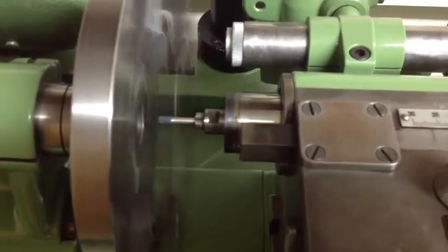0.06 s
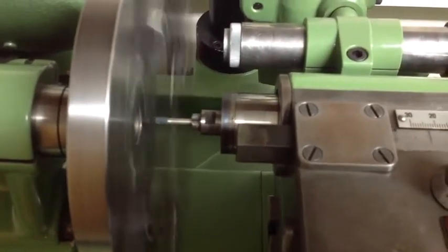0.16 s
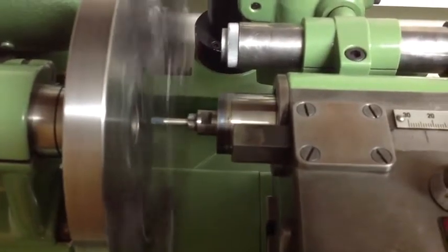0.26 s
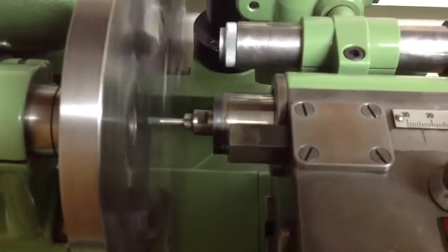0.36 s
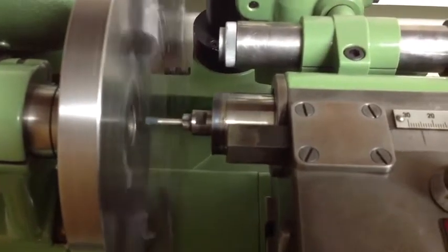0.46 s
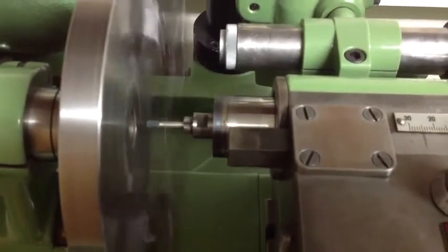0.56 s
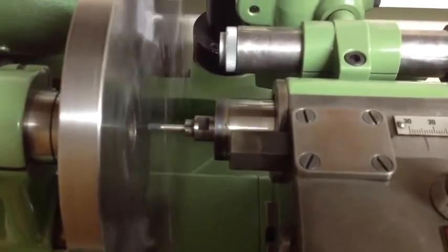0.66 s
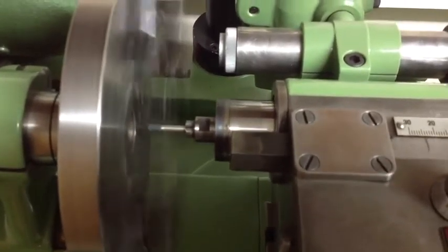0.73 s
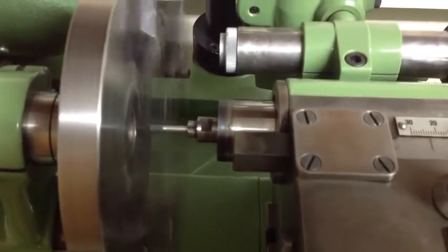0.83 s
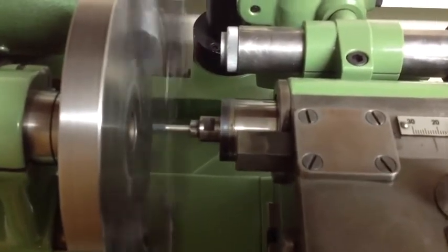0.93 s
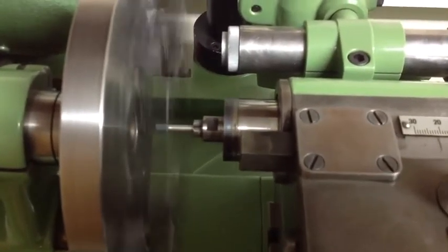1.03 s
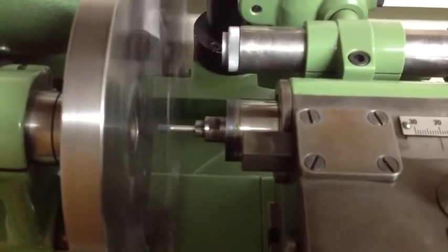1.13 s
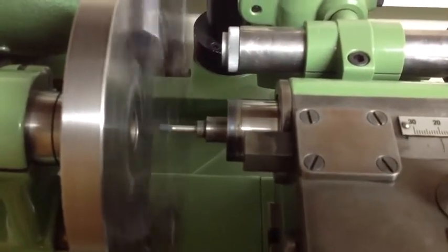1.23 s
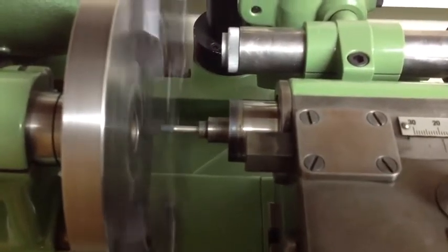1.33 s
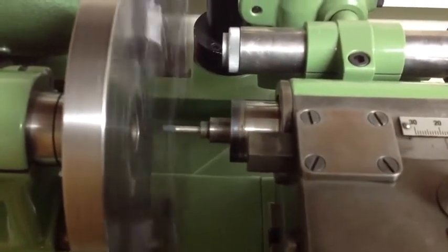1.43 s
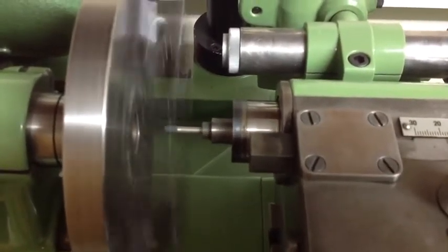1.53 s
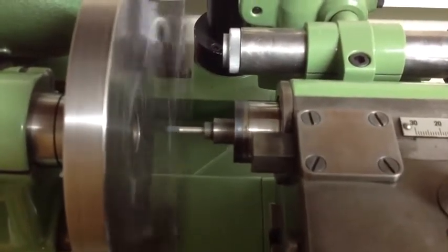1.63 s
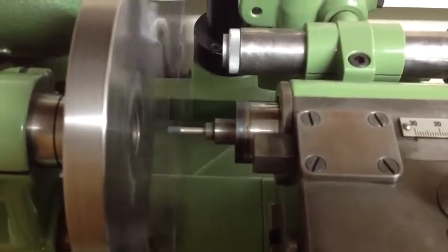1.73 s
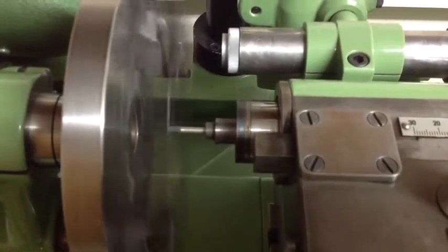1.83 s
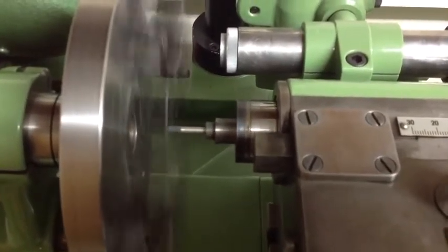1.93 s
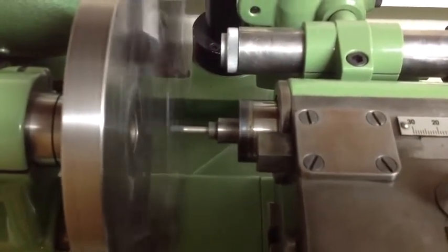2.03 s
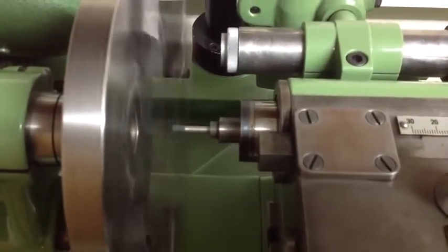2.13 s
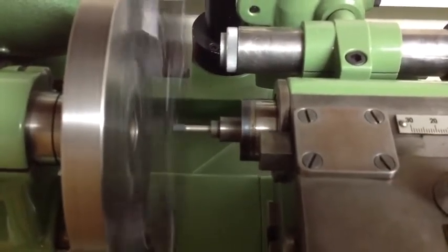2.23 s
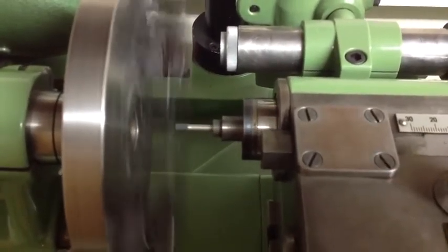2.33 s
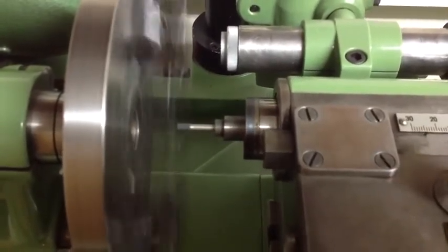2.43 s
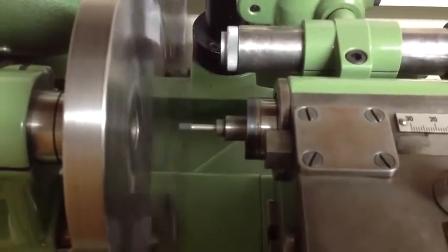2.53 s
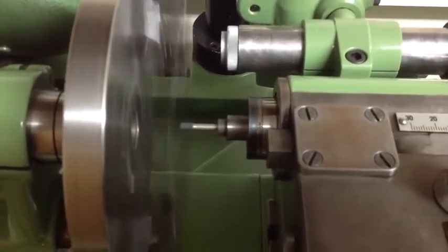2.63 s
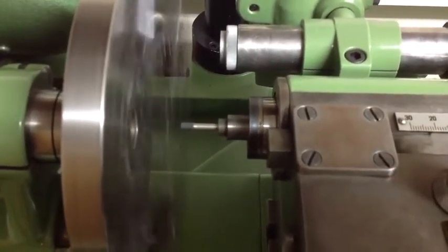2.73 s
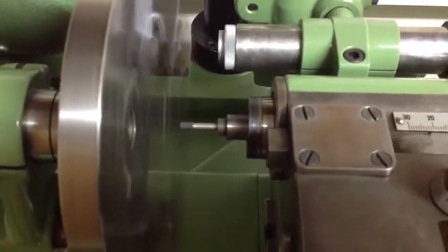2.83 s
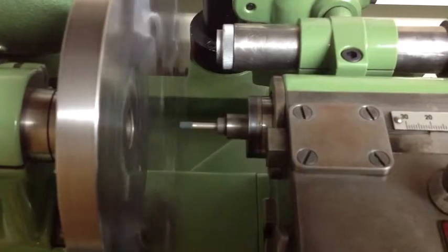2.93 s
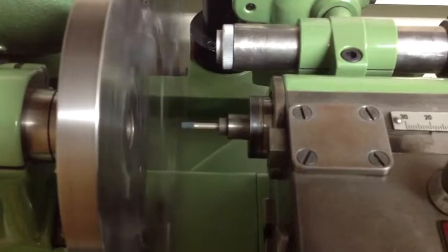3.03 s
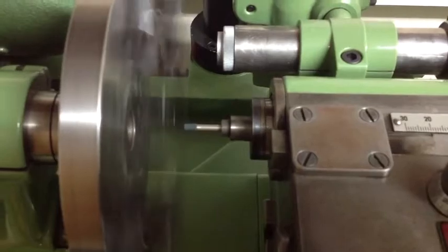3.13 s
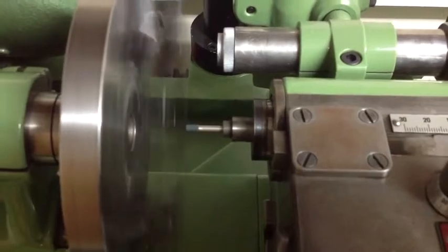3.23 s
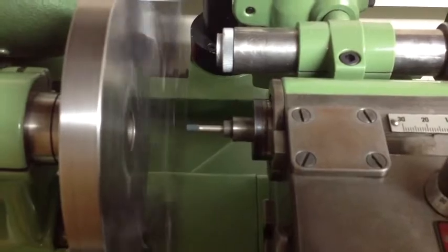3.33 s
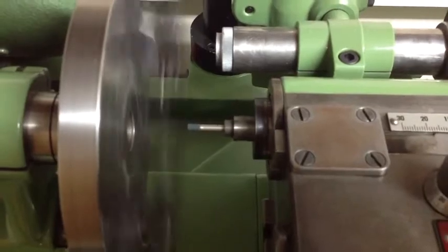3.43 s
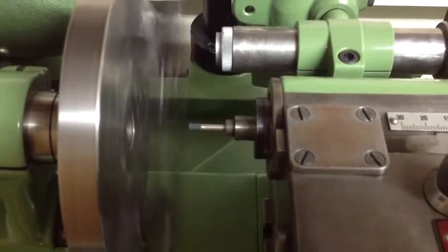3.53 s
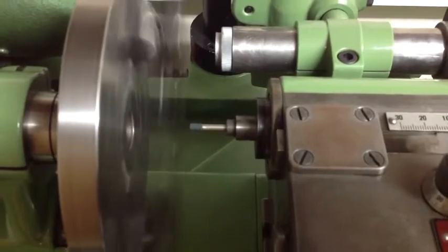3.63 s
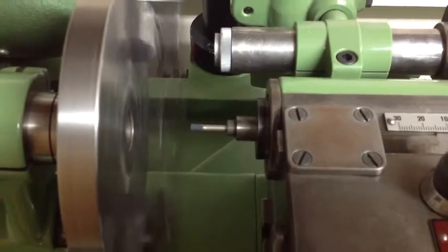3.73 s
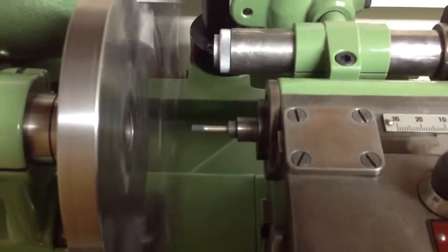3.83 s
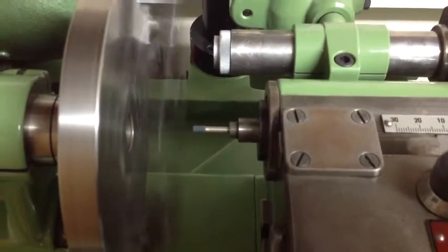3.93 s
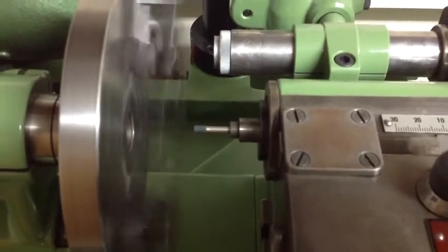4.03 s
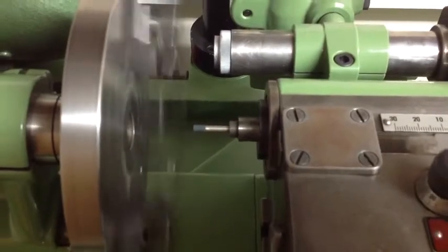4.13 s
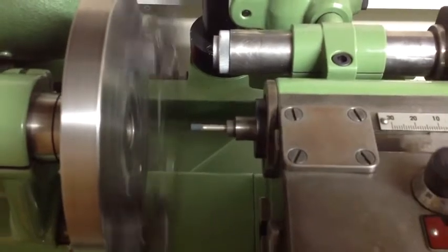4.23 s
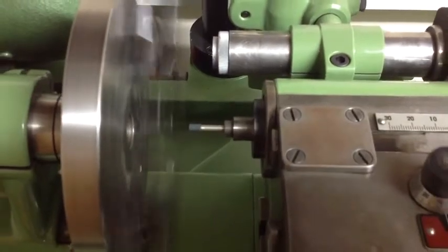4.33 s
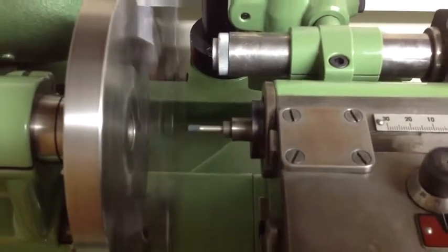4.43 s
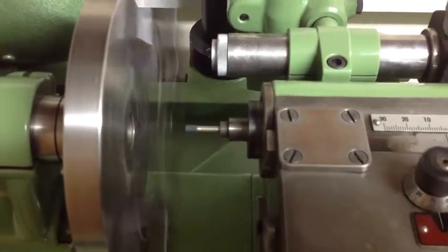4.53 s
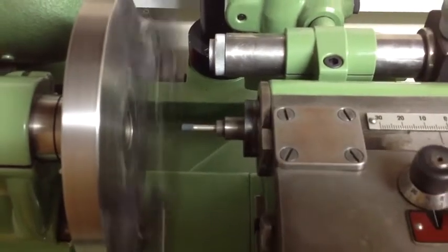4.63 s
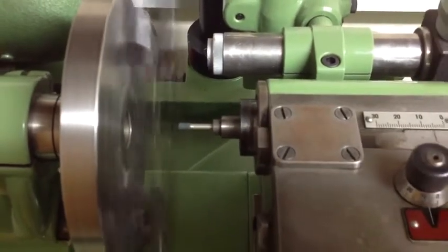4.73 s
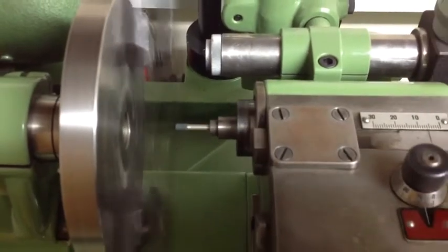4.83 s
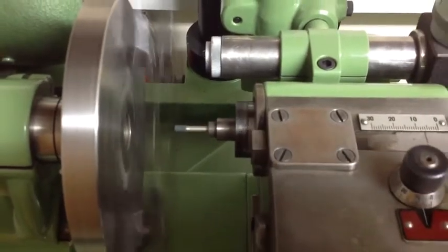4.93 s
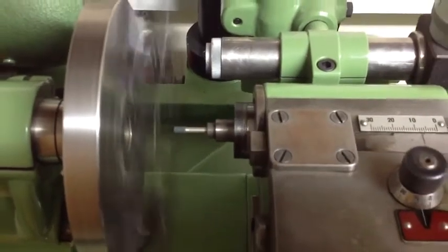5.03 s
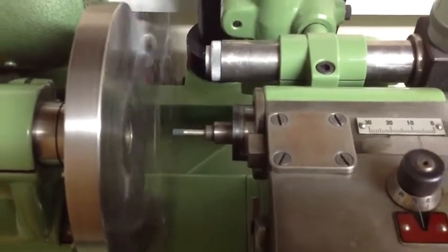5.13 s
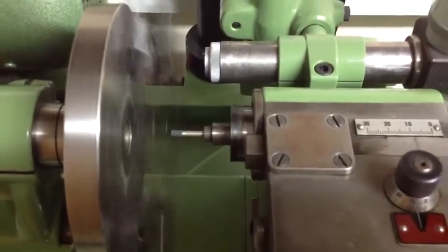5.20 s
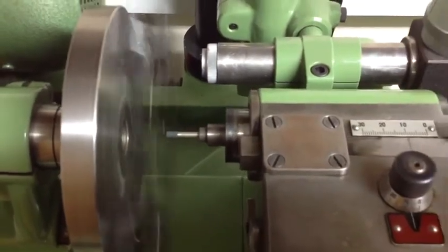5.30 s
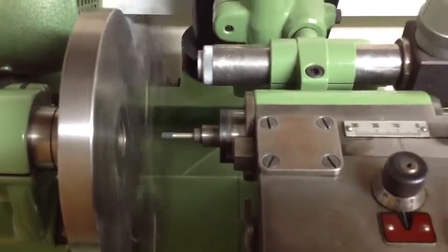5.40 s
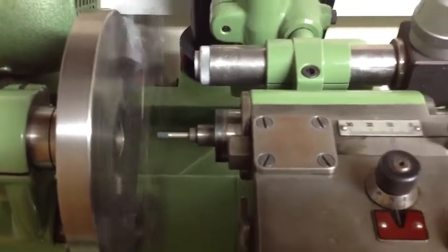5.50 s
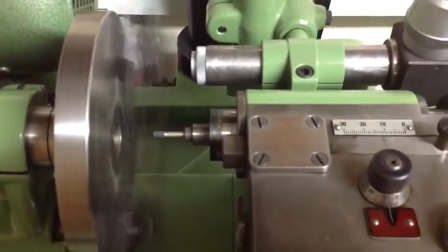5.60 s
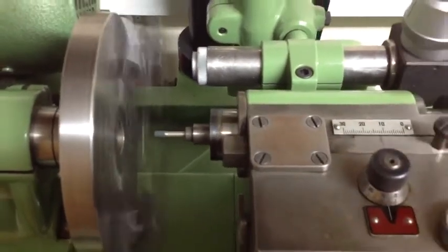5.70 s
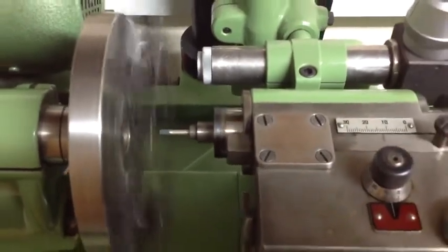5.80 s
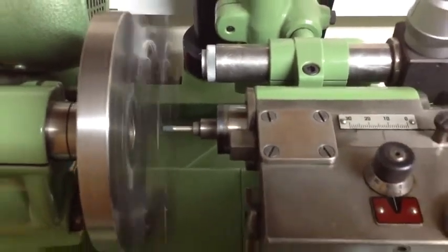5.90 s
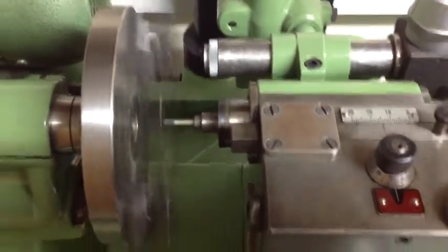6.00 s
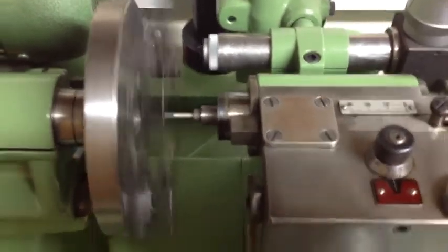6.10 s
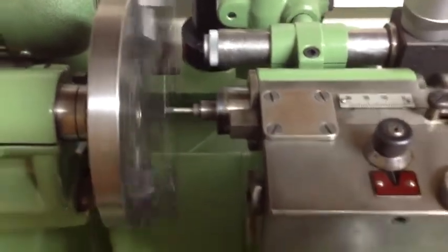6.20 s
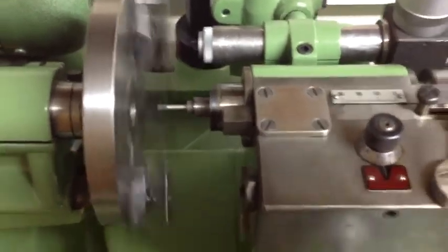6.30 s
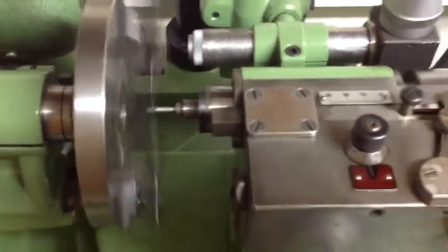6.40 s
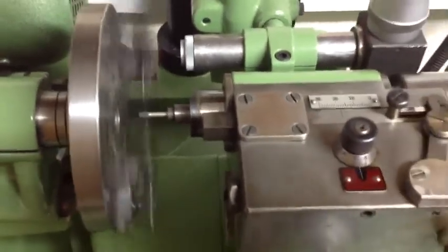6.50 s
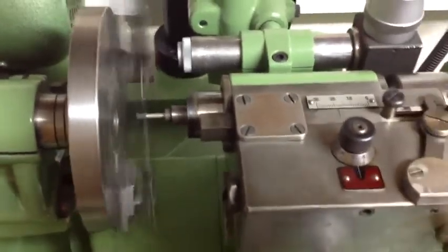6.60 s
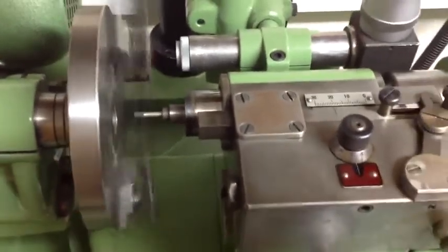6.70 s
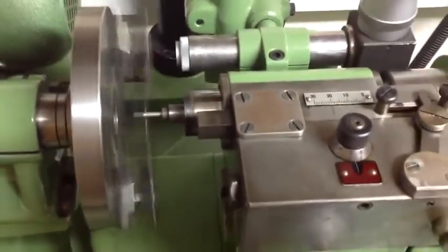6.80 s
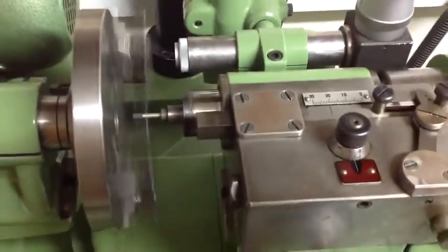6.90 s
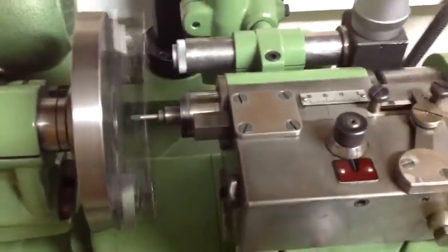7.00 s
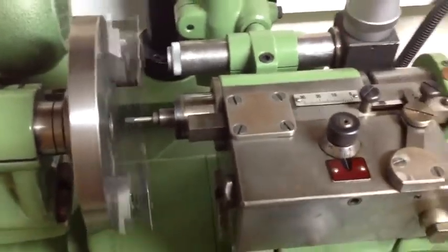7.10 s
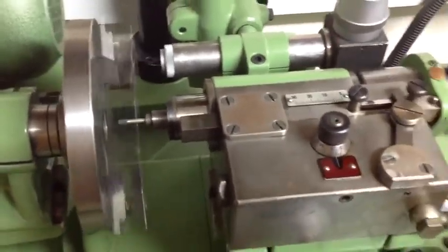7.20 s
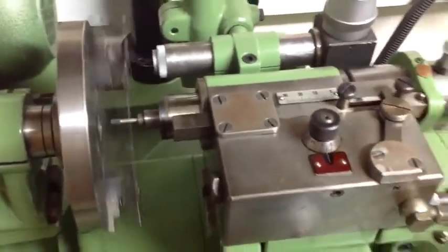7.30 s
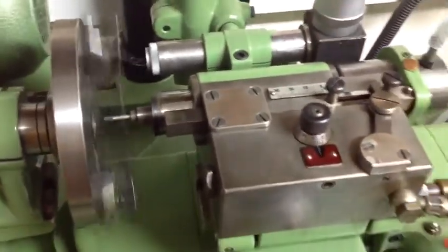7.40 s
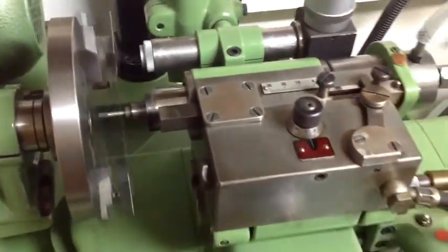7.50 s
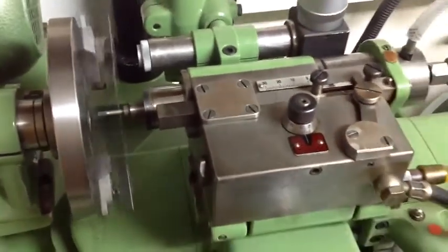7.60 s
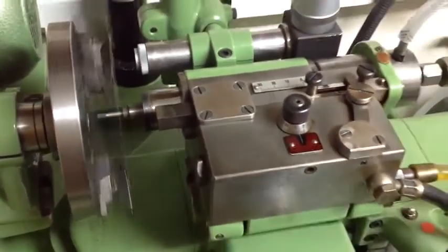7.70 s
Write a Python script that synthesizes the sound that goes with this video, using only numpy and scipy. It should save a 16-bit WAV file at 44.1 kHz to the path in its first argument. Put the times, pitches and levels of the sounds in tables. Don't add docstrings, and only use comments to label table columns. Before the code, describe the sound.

A machine's work head hums dully in a workshop. Within half a second compressed air starts hissing and swells into a bright, ringing rush. The small turbine rotor breaks away, its blade whine sweeping quickly upward and flaring on metal resonances until it leaves the top of hearing. Lower shaft and bearing tones follow, still climbing, more slowly, into a wavering whine. Close single microphone, treble slightly grainy.

```python
import sys
import numpy as np
from scipy import signal
from scipy.io import wavfile
from scipy.ndimage import uniform_filter1d, map_coordinates

SR = 44100
rng = np.random.default_rng(int(sys.argv[2]) if len(sys.argv) > 2 else 0)


def voltage_ratio(level):
    return 10 ** (np.asarray(level, float) / 20)


def master(y):
    cut = np.clip(np.atleast_2d(y).T, -1, 1)
    pcm = np.round(cut * 32767)
    wavfile.write(sys.argv[1], SR, pcm.astype(np.int16))


N = 341775
TIME = np.arange(N) / SR
EDGE_HZ = 15290


def evened(x):
    return x / np.sqrt(np.mean(x ** 2) + 1e-20)


def read(points, hz):
    f, db = np.transpose(points)
    return np.interp(np.log(hz + 1), np.log(f + 1), db)


def columns(rows, t):
    s, *values = np.transpose(rows)
    return [np.interp(t, s, v) for v in values]


def wander(rate_hz):
    steps = rng.standard_normal(400)
    return map_coordinates(steps, [np.clip(TIME * rate_hz, 0, 399)], order=3)


def bump(s, db, length_s):
    gain = np.zeros(N)
    span = slice(max(round((s - 2 * length_s) * SR), 0), round((s + 2 * length_s) * SR))
    gain[span] = voltage_ratio(db) * np.exp(-3 * ((TIME[span] - s) / length_s) ** 2)
    return gain


def bells(rows, hz):
    return voltage_ratio(sum(db / (1 + (2 * (hz - f) / width_hz) ** 2) for f, width_hz, db in rows))


def octave_bell(hz, centre_hz, octaves):
    return np.exp(-(np.log2(hz / centre_hz + 1e-6) / octaves) ** 2)


def noise(magnitude, patchy_db):
    t = (np.arange(N // 512 + 5) * 512 / SR)[None]
    hz = np.fft.rfftfreq(2048, 1 / SR)[:, None]
    real, imag, patches = rng.standard_normal((t.size, hz.size, 3)).T
    patches = uniform_filter1d(patches, size=14, axis=0)
    patches = evened(uniform_filter1d(patches, size=10, axis=1))
    z = (real + 1j * imag) * magnitude(t, hz) * voltage_ratio(patchy_db * patches)
    return evened(signal.istft(z, nperseg=2048, noverlap=1536)[1][:N])


def echoes(x, t60_s, wet_db):
    t = np.arange(round(.4 * SR)) / SR
    sparse = rng.random(len(t)) < .05
    taps = rng.standard_normal(len(t)) * sparse * voltage_ratio(-60 * t / t60_s) * (t > .001)
    return x + voltage_ratio(wet_db) * signal.fftconvolve(x, taps / np.linalg.norm(taps))[:N]


# frequency in Hz, density in dB per Hz.
SHOP_RUSH = [(50, -52), (110, -48), (200, -24.5), (400, -27.5), (900, -24), (1500, -26), (2500, -23),
             (2900, -35), (4600, -34.5), (8000, -33), (15300, -29)]
# frequency in Hz, width in Hz, level over the rush in dB.
SHOP_RING = [(1133, 32, 8.5), (2270, 68, 4), (3440, 110, 20), (5210, 83, 17.5)]
# frequency in Hz, level in dB, width in Hz.
HUM = [(125, -71.5, 6), (221, -59, 3.6), (438.3, -59, 8.14), (546, -57, 8.66), (654, -56, 11.4)]


def shop():
    rush = noise(lambda t, hz: voltage_ratio(read(SHOP_RUSH, hz)) * bells(SHOP_RING, hz), patchy_db=2.4)
    out = voltage_ratio(-41) * rush
    for hz, db, width_hz in HUM:
        level = voltage_ratio(db + 1.16 * wander(8.2))
        line_hz = hz + 0.213 * width_hz * wander(12)
        out += level * np.sqrt(2) * np.sin(2 * np.pi * np.cumsum(line_hz) / SR)
    return out


# frequency in Hz, width in Hz, level in dB.
HOUSING = [(870, 55, -1), (1148, 118, -7.5), (1842, 93, -2.5), (1987, 60, -5.5), (2226, 66, -9),
           (3107, 130, -4.5), (4195, 63, -3.5), (4475, 73, -1), (5643, 65, -2.5), (6400, 290, -11),
           (6730, 60, -12.5), (7780, 60, -10), (8070, 112, -2.5), (8640, 1240, -9), (9410, 250, -7.5),
           (10130, 140, -7.5), (11180, 80, -5), (11590, 59, -6), (12070, 64, -8), (12500, 160, -7.5),
           (13470, 100, -3), (13500, 160, -5), (14400, 120, 5), (14930, 320, 0.5)]


def ringing(hz):
    modes = 0
    for f, width_hz, db in HOUSING:
        modes = modes + voltage_ratio(db) ** 2 / (1 + (2 * (hz - f) / max(width_hz, 85)) ** 2) ** 1.3
    return modes * np.where(hz < 2650, voltage_ratio(-15.5), 1) / (1 + (hz / 12500) ** 8)


# frequency in Hz, density in dB per Hz.
JET = [(200, -61), (700, -23), (1400, -23.5), (2200, -19), (3700, -11.5), (5000, -7.5), (7000, -11.5),
       (9000, -15), (12000, -6), (15300, -18)]


def jet(hz):
    return voltage_ratio(read(JET, hz))


# time in seconds, air flow in dB, microphone turn from the housing (0) to the jet (1).
AIR = [(0.0, -51, -0.26), (0.41, -38, -0.84), (0.48, -32, 0.42), (0.68, -24, 0.65), (1.0, -21.5, 0.72),
       (1.45, -16, 0.48), (2.05, -15.5, 0.13), (2.25, -19.5, 0.69), (2.55, -19, 0.77), (2.85, -19, 0.42),
       (3.3, -18, 0.86), (4.4, -17.5, 0.85), (4.72, -16.5, 0.47), (5.5, -18, 0.85), (5.9, -16, 0.31),
       (6.65, -17, 0.62), (7.3, -15.5, 0.14), (7.75, -18.5, 0.86)]
# time in seconds, level in dB, length in seconds.
STUMBLES = [(3.37, -5.5, .09), (3.68, -5, 0.049), (3.849, -8.5, 0.061), (3.918, -5, 0.043),
            (4.001, -8.5, 0.063), (4.1, -4.5, 0.08)]
TURN_LOW_DB, TURN_MID_DB, TURN_TOP_DB, TURN_RING_DB = 5, 2.5, 6.5, -1
SLOW_RING_DB, SLOW_LOW_DB, SLOW_UNTIL_S = 4, -1.5, 3.3
DRIFT_DB, DRIFT_S, DRIFT_HZ = 0.64, .7, 260


def air_colour(t, hz):
    turn = columns(AIR, t)[1]
    slow = .5 - .5 * np.tanh((t - SLOW_UNTIL_S) / 0.41)
    tint_db = (TURN_LOW_DB * turn + SLOW_LOW_DB * slow) * octave_bell(hz, 970, 1.0)
    tint_db = tint_db + (TURN_MID_DB * turn - 0.5) * octave_bell(hz, 2050, 0.88)
    tint_db = tint_db + TURN_TOP_DB * turn * octave_bell(hz, 12200, 1.0)
    drift = uniform_filter1d(rng.standard_normal((t.size, hz.size)), round(DRIFT_S * SR / 512), axis=0)
    drift = uniform_filter1d(drift.T, round(DRIFT_HZ * 2048 / SR), axis=0)
    tint_db = tint_db + DRIFT_DB * evened(drift)
    ring_db = TURN_RING_DB * turn + SLOW_RING_DB * slow + 0.43
    hiss = jet(hz) * np.minimum(hz / 220, 1) ** 4
    return np.sqrt(hiss ** 2 + voltage_ratio(ring_db) ** 2 * ringing(hz)) * voltage_ratio(tint_db)


def air():
    flow_db = columns(AIR, TIME)[0]
    flow_db = flow_db + sum(db * bump(s, 0, length_s) for s, db, length_s in STUMBLES)
    return voltage_ratio(flow_db + 0.41 * wander(35)) * noise(air_colour, patchy_db=1.86)


# time in seconds, frequency in Hz, level in dB, length in seconds.
SHUDDERS = [
    (1.665, 2566, -29, 0.2),
    (2.05, 4150, -18, 0.062),
]


def shudders():
    out = np.zeros(N)
    for s, mode_hz, db, length_s in SHUDDERS:
        mode = noise(lambda t, hz: 1 / (1 + ((hz - mode_hz) / 45) ** 2), patchy_db=-3.0)
        out += bump(s, db, length_s) * mode
    return out


START_S, TOP_HZ, DRAG_S, TORQUE_S = 1.0945, 1373.85, 2.2413, .3178
SAG_HZ, SAG_AT_S, SAG_S = 14.86, 4.494, 1.551


def speed():
    t = np.maximum(TIME - START_S, 0)
    lag = (DRAG_S * np.exp(-t / DRAG_S) - TORQUE_S * np.exp(-t / TORQUE_S)) / (DRAG_S - TORQUE_S)
    sag_hz = SAG_HZ * np.exp(-((TIME - SAG_AT_S) / SAG_S) ** 2)
    return np.maximum(TOP_HZ * (1 - lag) - sag_hz, 0)


def tone(order, hz, turns):
    return np.sqrt(2) * np.sin(2 * np.pi * (order * turns + rng.random())) * (order * hz < EDGE_HZ)


# time in seconds, multiple of shaft speed, level in dB.
OVERTONES = [(2.61, 8, -27), (2.66, 10, -29), (2.78, 7, -30), (2.8, 5, -32), (2.85, 17, -30),
             (2.95, 10, -29), (3.11, 8, -31), (3.11, 21, -30), (3.31, 4, -35), (3.44, 7, -30),
             (3.7, 4, -33), (3.46, 8, -28), (3.78, 5, -30), (4.05, 6, -33), (4.35, 6, -31), (4.53, 8, -30),
             (4.68, 11, -30), (4.88, 14, -32), (4.93, 6, -32), (5.31, 8, -30), (5.32, 4, -29),
             (5.33, 5, -29), (5.37, 11, -30), (5.88, 3, -34), (6.45, 4, -33), (6.59, 10, -32),
             (6.72, 3, -35), (6.88, 3, -35), (7.44, 3, -35), (7.58, 11, -32)]
# time in seconds, multiple of shaft speed, level in dB.
RACES = [(2.27, 13.013, -34), (2.4, 12.818, -34), (2.49, 12.103, -31), (3.25, 5.875, -29),
         (3.63, 5.875, -32), (2.61, 7.97, -29), (3.21, 15.908, -31), (3.56, 7.415, -31), (3.7, 13.643, -30),
         (4.04, 12.478, -27), (4.15, 12.818, -25), (4.33, 12.103, -24), (4.34, 6.6, -34),
         (4.54, 12.818, -31), (4.84, 12.103, -30), (4.85, 11.263, -25), (4.98, 5.875, -27),
         (4.99, 12.478, -31), (5.24, 13.013, -26), (5.7, 2.51, -33), (5.86, 7.97, -33), (5.92, 2.51, -33),
         (7.35, 7.97, -32)]
OVERTONE_S, RACE_S = .13, .18
FAN_HZ, FAN_OCTAVES = 850, 1.05


def weak_tones(hz, turns):
    fan = octave_bell(hz, FAN_HZ, FAN_OCTAVES)
    out = np.zeros(N)
    for rows, length_s in (OVERTONES, OVERTONE_S), (RACES, RACE_S):
        for order in sorted({row[1] for row in rows}):
            tone_hz = order * hz
            body = np.sqrt(jet(tone_hz) ** 2 + ringing(tone_hz))
            faint = voltage_ratio(-32.5 + 2.5 * np.minimum(wander(14), 1)) * body * fan * (tone_hz > 2500)
            swells = sum(bump(s, db, length_s) for s, k, db in rows if k == order)
            out += np.maximum(faint, swells) * tone(order, hz, turns)
    return out


# time in seconds, level in dB.
BLADE = [(1.3, -37), (1.5, -43), (1.65, -50), (1.77, -42), (1.84, -24), (2.25, -23), (2.38, -28),
         (2.6, -24), (3.1, -27)]
# time in seconds, level in dB, length in seconds.
FLARES = [(1.47, -28.5, 0.028), (1.86, -14, 0.0084), (1.94, -11.5, 0.0075), (1.979, -15, 0.012),
          (2.001, -17.5, 0.009), (2.081, -16, 0.011), (2.098, -10, 0.005), (2.117, -10.5, 0.03),
          (2.154, -14, 0.038), (2.203, -15, 0.016), (2.222, -13, 0.016), (2.25, -12, 0.032),
          (2.495, -26, 0.015), (2.584, -18, 0.005), (2.606, -16, 0.023), (2.625, -15, 0.01),
          (2.646, -14, 0.014), (2.688, -9, 0.01), (2.711, -12, 0.008), (2.752, -13, 0.012),
          (2.784, -12, 0.009), (2.81, -10.5, 0.014), (2.828, -12, 0.005), (2.85, -12, 0.015),
          (2.885, -11, 0.017), (2.997, -8, 0.021)]


def blade_tone(hz, turns):
    begun = np.clip((TIME - BLADE[0][0]) / 0.023, 0, 1)
    flutter = voltage_ratio(columns(BLADE, TIME)[0] + 4.6 * np.minimum(wander(60), 1)) * begun
    flares = np.max([bump(*row) for row in FLARES], axis=0)
    return np.maximum(flutter, flares) * tone(22, hz, turns)


# time in seconds, multiple of shaft speed.
NULLS = [(4.889, 1), (5.219, 2), (5.412, 1), (5.445, 2), (5.772, 2), (5.894, 3.485), (6.023, 3.485),
         (6.105, 2), (6.14, 3.485), (6.453, 3.485), (6.67, 2), (6.774, 1), (7.136, 1), (7.237, 2),
         (7.653, 3.485)]


def heard(order):
    gain = np.ones(N)
    for s, k in NULLS:
        if k == order:
            gain *= np.tanh((TIME - s) / .025)
    return gain


STRONG_ORDERS = 1, 2, 3.485, 5.045, 9.002, 9.728
# time in seconds, level in dB, length in seconds.
UNBALANCE = [(2.6, -54, .5), (3.68, -44, .25), (4.05, -43.5, 0.12), (4.5, -45, 0.18), (4.86, -31, 0.3),
             (5.12, -27.5, 0.19), (5.4, -34.5, 0.54), (5.88, -37, 0.22), (6.24, -30, 0.19),
             (6.46, -32.5, 0.17), (6.65, -30, 0.2), (6.92, -30.5, 0.35), (7.26, -30.5, .15),
             (7.48, -23.5, .3), (7.75, -28.5, 0.32)]
# time in seconds, level in dB, length in seconds.
SECOND = [(2.723, -43, .3), (3.2, -38.5, 0.39), (3.695, -30.5, 0.3), (3.984, -34.5, .3), (4.373, -32, 0.34),
          (4.81, -27, 0.33), (5.03, -33.5, 0.25), (5.382, -34.5, 0.68), (5.82, -35, 0.36),
          (6.067, -31.5, 0.18), (6.364, -29.5, 0.25), (6.542, -30, 0.2), (7.036, -29.5, 0.35),
          (7.355, -32.5, 0.34), (7.7, -29, 0.31)]
# time in seconds, level in dB, length in seconds.
BALLS_LOW = [(3.59, -27, 0.078), (4.4, -34, 0.77), (5.022, -34.5, 0.26), (5.395, -35, 0.33),
             (5.97, -20.5, 0.38), (6.495, -26, 0.33), (7.026, -26.5, 0.12), (7.45, -20, 0.28)]
# time in seconds, level in dB, length in seconds.
BALLS_MID = [(3.8, -34, 0.13), (5.0, -32, 0.24), (6.2, -34, .4), (6.75, -24, 0.45), (7.0, -31, 0.22),
             (7.35, -27, 0.79)]
# time in seconds, level in dB, length in seconds.
BALLS_HIGH = [(3.18, -33, .2), (3.9, -43, .3), (5.38, -28.5, 0.14), (6.06, -32, 0.28), (6.47, -35, .2),
              (7.0, -24.5, .18), (7.25, -30, .18), (7.62, -25, .17)]
# time in seconds, level in dB, length in seconds.
BALLS_TOP = [(5.0, -29, .2), (5.8, -26.5, 0.16), (6.53, -26, 0.28), (7.08, -26, 0.18), (7.4, -31, 0.35)]
REST_DB, CAGE_ORDER = -44, .36


def strong_tones(hz, turns):
    rest = voltage_ratio(REST_DB) * (hz / TOP_HZ) ** 2.5
    tables = UNBALANCE, SECOND, BALLS_LOW, BALLS_MID, BALLS_HIGH, BALLS_TOP
    out = voltage_ratio(-59.0 + 1.7 * wander(2.5)) * (hz / 1250) ** 6.0 * tone(CAGE_ORDER, hz, turns)
    for order, rows in zip(STRONG_ORDERS, tables):
        level = np.sqrt(rest ** 2 + sum(bump(*row) ** 2 for row in rows))
        out += level * heard(order) * tone(order, hz, turns)
    return out


def spindle():
    hz = speed()
    turns = np.cumsum(hz * (1 + 0.0003 * wander(30))) / SR
    strong = echoes(strong_tones(hz, turns), t60_s=.2, wet_db=-16)
    blade = echoes(blade_tone(hz, turns), t60_s=0.3, wet_db=-5.5)
    weak = echoes(weak_tones(hz, turns), t60_s=0.2, wet_db=-5.5)
    return strong + blade + weak


def scene():
    return np.tile(shop() + air() + shudders() + spindle(), (2, 1))


def band_limit(x):
    return signal.sosfilt(signal.butter(12, 16570, fs=SR, output="sos"), x)


# frequency in Hz, width in Hz, level in dB.
DIPS = [(9800, 250, -3), (13000, 300, -2.5)]
# time in seconds, from Hz, to Hz.
SPLITS = [(0.348, 11710.0, 13180.0), (1.367, 10940.0, 12580.0), (1.37, 4650.0, 7060.0),
          (1.599, 4050.0, 5340.0), (2.183, 6890.0, 11200.0), (2.879, 4050.0, 5340.0),
          (2.879, 9560.0, 12580.0), (2.926, 13610.0, 15500.0), (3.483, 4570.0, 5860.0),
          (5.991, 6200.0, 8440.0), (7.152, 10250.0, 11890.0)]


def record(dry):
    hz, t, z = signal.stft(dry[0], SR, nperseg=1024, noverlap=768)
    hz = hz[:, None]
    low_cut = 1 / np.sqrt(1 + (85 / (hz + 1)) ** 2.6)
    z = z * bells(DIPS, hz) * low_cut
    patch = uniform_filter1d(uniform_filter1d(abs(z) ** 2, size=3, axis=0), size=7, axis=1)
    around = np.exp(uniform_filter1d(np.log(patch + 1e-20), size=161, axis=0))
    weak = patch < voltage_ratio(-6.8 + hz / 16000) ** 2 * around
    z = z * np.where(weak & (hz > 7200), .05, 1)
    apart = sum((abs(t - s) < .02) * ((hz > low_hz) & (hz < high_hz)) for s, low_hz, high_hz in SPLITS)
    phase = np.exp(2j * np.pi * rng.random(z.shape))
    side = voltage_ratio(-2.5) * apart * abs(z) * phase
    pair = signal.istft(np.array([z + side, z - side]), nperseg=1024, noverlap=768)[1][:, :N]
    edge = signal.firwin(1023, EDGE_HZ, window=("kaiser", 10), fs=SR)
    return band_limit(signal.oaconvolve(pair, edge[None], "same"))


dry = scene()
out = record(dry)
master(out)
```